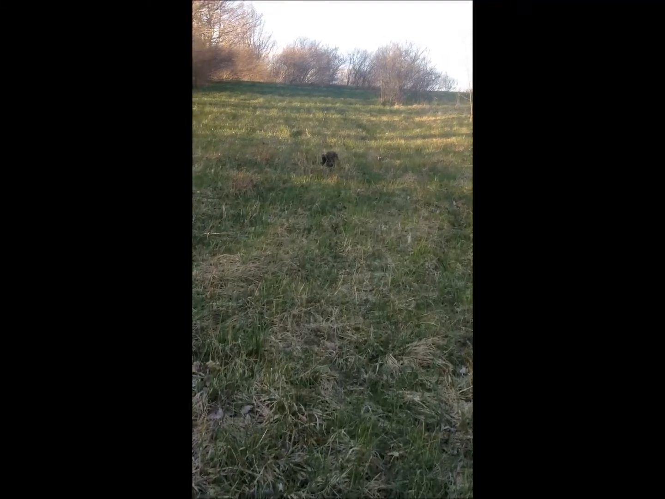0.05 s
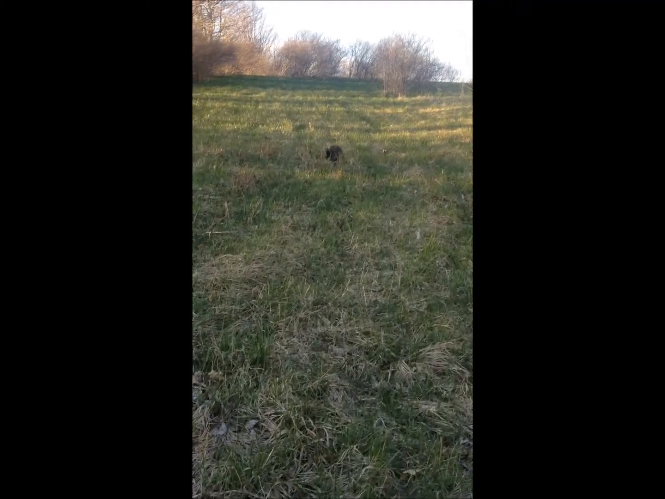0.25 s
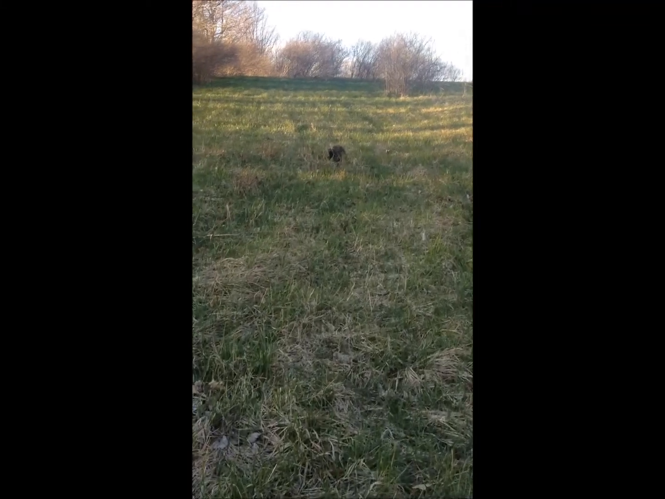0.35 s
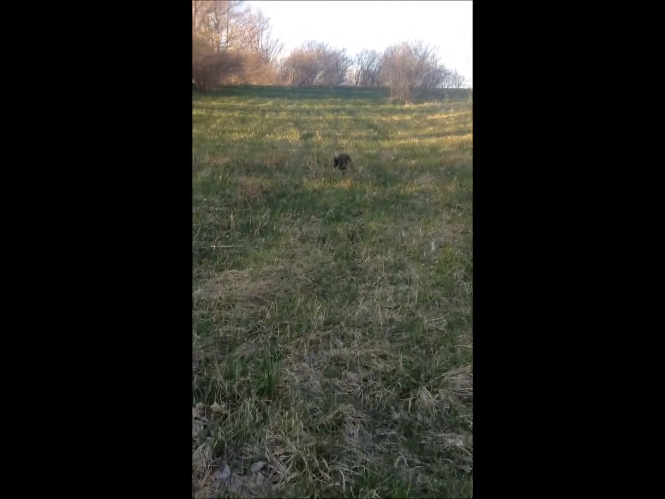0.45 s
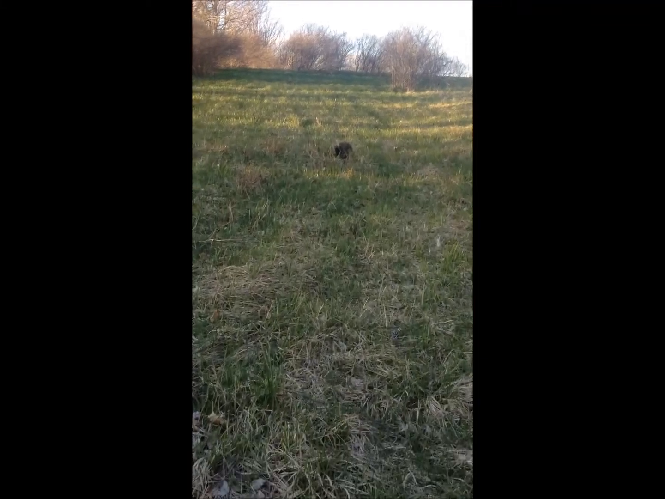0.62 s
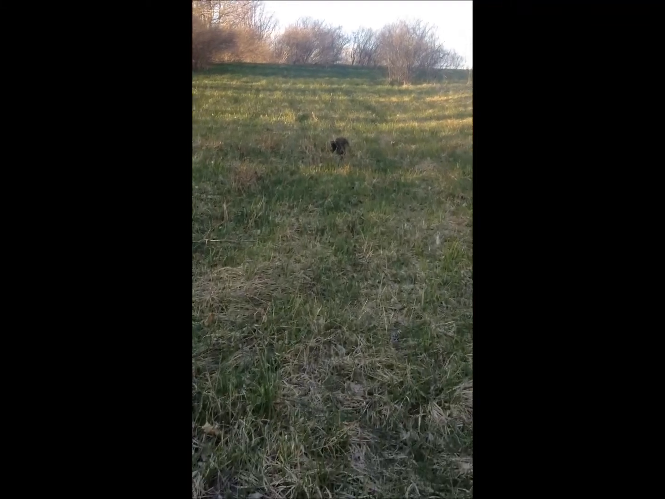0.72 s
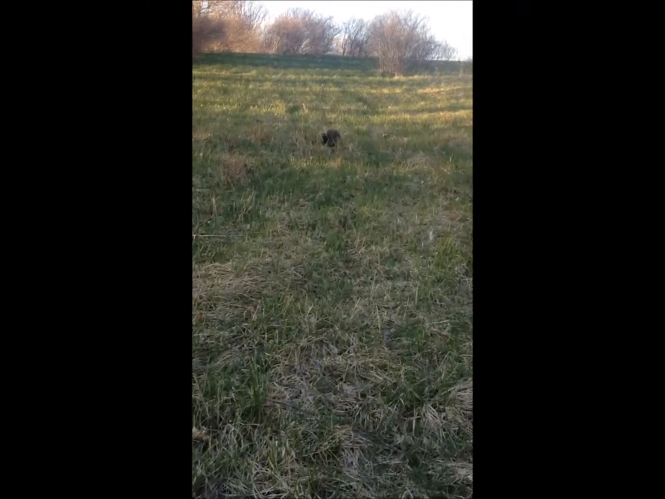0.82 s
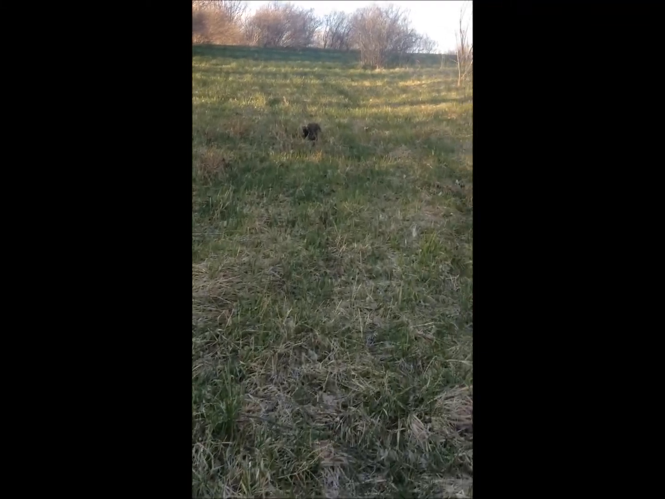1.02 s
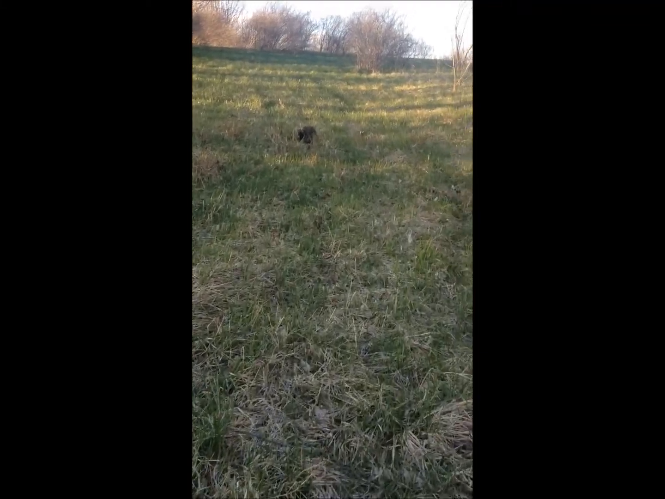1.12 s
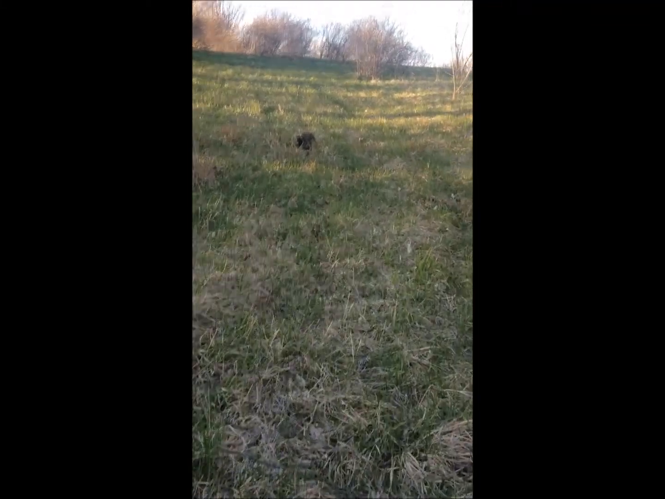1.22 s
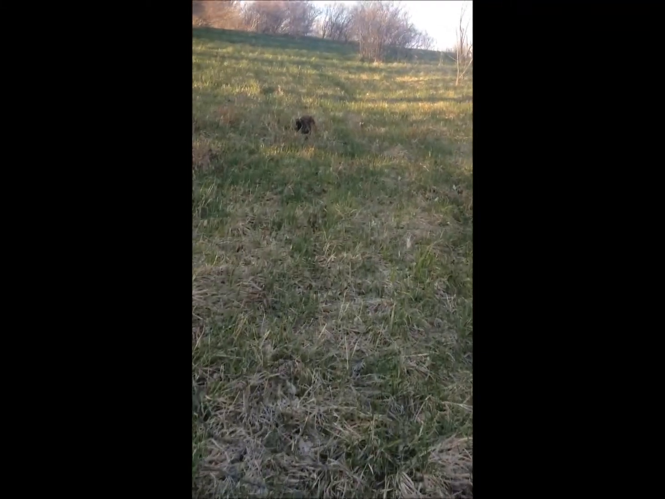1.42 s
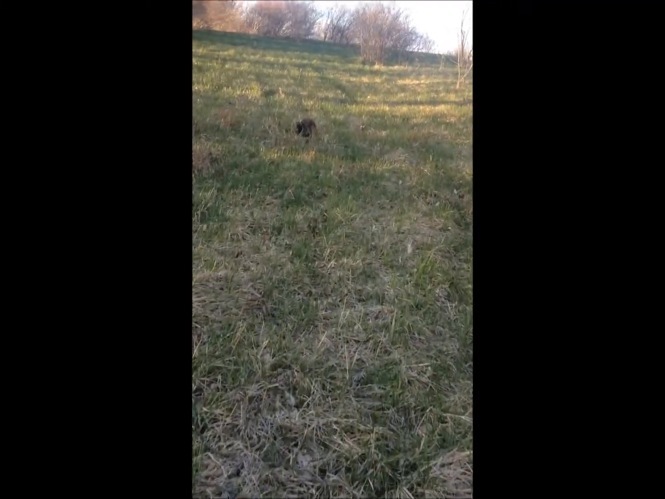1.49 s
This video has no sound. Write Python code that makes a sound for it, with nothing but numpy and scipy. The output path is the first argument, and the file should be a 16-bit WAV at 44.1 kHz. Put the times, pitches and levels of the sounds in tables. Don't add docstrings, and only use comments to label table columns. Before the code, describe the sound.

Two slow steps through dry, matted grass outdoors, with swishing blades, ticking straws, snapping stems and dull soft thuds; very faint breeze and slight low handling rumble beneath, close, dry phone sound without echo.

```python
import sys
import numpy as np
from scipy import signal
from scipy.fft import rfft, irfft
from scipy.io import wavfile
from scipy.ndimage import uniform_filter1d

SR = 44100
rng = np.random.default_rng(int(sys.argv[2]) if len(sys.argv) > 2 else 0)


def generate_wav(sig):
    pcm = np.round(np.clip(np.atleast_2d(sig).T, -1, 1) * 32767).astype(np.int16)
    wavfile.write(sys.argv[1], SR, pcm)


def gain_from_db(level_db):
    decades = np.asarray(level_db, float) / 20
    return 10 ** decades


N = 68355

# pitch_hz, level_db
BREEZE_COLOUR = [(15, -60), (25, -30), (75, -16), (178, -1.5), (509, -5), (722, -16.5), (1050, -10.5),
                 (7700, -21), (15500, -51)]
# pitch_hz, level_db
MAT_COLOUR = [(60, 6), (120, -8.5), (200, -3), (350, -0.5), (600, -3), (1100, -7), (2200, -16.5),
              (5000, -28.5)]
# pitch_hz, level_db
BLADE_COLOUR = [(700, -3.5), (1500, -1), (3000, -0.5), (5000, -2), (8300, -1.5), (9500, -7), (12000, -9),
                (15500, -9)]
# time_s, level_db
WEIGHT = [(0, -59), (.1, -55.5), (.15, -54), (.25, -51), (.34, -49.5), (.42, -48.5), (.5, -55), (.7, -58.5),
          (.82, -59.5), (1.024, -55), (1.061, -41.5), (1.113, -39), (1.141, -65.5), (1.186, -44),
          (1.241, -66), (1.332, -49.5), (1.47, -59.5), (1.53, -56)]
# time_s, level_db, brightness_db_per_octave
SWEEP = [(0, -48.5, -1), (.13, -64.5, 2.5), (0.202, -46, -3), (.3, -50.5, -2), (.345, -42, -5),
         (.42, -45.5, -4), (.47, -49.5, -1), (0.542, -39.5, -1.5), (.63, -46, -1), (.8, -51, -1.5),
         (.84, -58, 0), (1.028, -57, 0), (1.03, -40, -1.5), (1.11, -41.5, 0), (1.145, -44, 0.5),
         (1.206, -41.5, -0.5), (1.39, -57, 2), (1.43, -58.5, -2.5)]
# start_s, peak_db, pitch_hz, length_ms
THUDS = [(0.1086, -47.5, 346, 1.3), (0.2393, -42.5, 472, 5.9), (0.2797, -62, 325, 3.5),
         (0.3138, -44, 313, 4), (0.3278, -41, 335, 32), (0.3693, -42, 510, 9.6), (0.4014, -37.5, 263, 3.2),
         (0.4362, -37, 364, 7.9), (0.4802, -29, 332, 3.2), (0.5526, -41.5, 380, 4.4),
         (0.6075, -41, 296, 1.6), (0.9433, -50.5, 410, 6.3), (1.0438, -33, 206, 4.9),
         (1.0585, -34, 381.5, 20), (1.0755, -34, 326, 4), (1.1089, -43, 310, 3.2), (1.182, -42, 234, 11),
         (1.3203, -42.5, 377, 4.4), (1.3315, -44, 400, 2.7), (1.5056, -44, 305, 4.7),
         (1.5215, -45, 390, 9.6), (1.5285, -43.5, 460, 3), (0.1, -47, 246, 6.6), (0.868, -45, 426, 10)]
# start_s, peak_db, pitch_hz, length_ms
KNOCKS = [(0.0475, -40, 1550, 1.1), (0.0932, -40, 1780, 2.1), (0.1976, -46, 1900, 2.7),
          (0.3133, -38.5, 870, 3.1), (0.3302, -30, 1420, 0.74), (0.337, -33.5, 1510, 5),
          (0.3695, -30, 607, 4.5), (0.3978, -31, 1620, 2.5), (0.4028, -28, 1180, 2.8),
          (0.4361, -30, 840, 3.5), (0.4802, -24.5, 1130, 1.8), (0.5386, -41, 1210, 6.4),
          (0.5539, -26, 930, 1.1), (0.5591, -33.5, 1000, 2.2), (0.6911, -37, 856, 3.8),
          (0.701, -35.5, 814, 1.4), (0.7292, -36.5, 1280, 0.56), (0.8836, -31.5, 1420, 0.97),
          (1.0292, -37.5, 1180, 2), (1.0362, -28.5, 960, 0.51), (1.0602, -20.5, 1036, 2.4),
          (1.0765, -35, 900, 1.9), (1.202, -35.5, 1730, 2.8), (1.2324, -31.5, 1050, 1.3),
          (1.2417, -37, 1260, 0.51), (1.268, -41, 1770, 6.7), (1.3796, -43.5, 1190, 2.2),
          (1.4022, -43.5, 676, 1), (1.4111, -41.5, 1280, 1.1), (1.4681, -47, 1100, 1),
          (0.2435, -40, 725, 1.5), (0.2762, -42, 880, 1.3), (0.2965, -50, 1090, 2.6),
          (1.0628, -40.5, 1060, 4), (1.0657, -35.5, 850, 3.6), (1.1812, -40, 970, 3.1),
          (1.1865, -39.5, 960, 1.5), (1.283, -43.5, 1060, 2.6), (1.3315, -48, 1130, 2),
          (1.4265, -42, 1910, 2)]
# start_s, peak_db, centre_hz, length_ms
SNAPS = [(0.0476, -39.5, 6700, 0.39), (0.0727, -41.5, 2870, 1), (0.0933, -37.5, 4030, 0.21),
         (0.1985, -44, 3740, 2.7), (0.2225, -47, 4820, 2), (0.2552, -41, 3000, 1.1),
         (0.3284, -30.5, 3660, 2.45), (0.3363, -32.0, 4550, 1.5), (0.3465, -36, 4930, 0.83),
         (0.4322, -32.5, 3290, 2.7), (0.4605, -42, 5140, 0.78), (0.4754, -38, 2670, 1.3),
         (0.5533, -36, 4780, 1.6), (0.6079, -49, 6050, 1.5), (0.7292, -42, 6200, 0.33),
         (0.7891, -40.5, 3040, 0.8), (0.7963, -40.5, 3450, 3.1), (1.0293, -27, 7400, 0.55),
         (1.0357, -36, 3960, 0.95), (1.0491, -27, 6900, 0.37), (1.058, -25.5, 6980, 1.16),
         (1.0773, -37, 7000, 1.6), (1.0955, -30, 2880, 3.1), (1.2028, -33, 4120, 1.5),
         (1.2195, -38, 5570, 1.0), (1.2324, -32.5, 4300, 0.25), (1.2687, -34, 5400, 0.45),
         (1.2969, -38, 5340, 0.57), (1.3108, -36, 7600, 0.37), (1.3812, -39, 6500, 0.69)]
# start_s, peak_db, centre_hz, length_ms
TICKS = [(0.009, -42.5, 6160, 0.44), (0.1421, -46, 6600, .5), (0.1755, -46.5, 2800, 1),
         (0.1982, -34.5, 2430, 0.66), (0.2035, -39.5, 2310, 1), (0.2095, -36, 3950, 0.44),
         (0.2245, -32, 5080, 1.7), (0.2435, -36, 3080, 2.2), (0.2475, -40, 7050, .6),
         (0.2752, -40, 3540, 0.45), (0.2957, -45, 4040, .6), (0.3018, -41.5, 7970, .3),
         (0.3125, -45, 3500, 0.46), (0.3705, -41, 4650, 0.91), (0.4185, -40, 6000, .6),
         (0.4361, -19.5, 6280, .45), (0.4815, -22.5, 2900, 1.2), (0.537, -34.5, 4970, 1.7),
         (0.5595, -36, 2000, 0.19), (0.6075, -33.5, 7160, 1.4), (0.6905, -40, 2620, 1.2),
         (0.8719, -45.5, 2550, 3.7), (0.9428, -45, 4720, 1.1), (1.0295, -28, 8540, 0.26),
         (1.031, -33, 8150, 1), (1.0635, -29.5, 7060, 1), (1.0655, -29, 6600, 1), (1.078, -30, 6150, 1.2),
         (1.1005, -30, 8900, .6), (1.1052, -23.5, 6300, 1.0), (1.1095, -31, 2870, 1),
         (1.1822, -34, 3460, .4), (1.242, -35.5, 2320, 0.35), (1.2425, -45, 8100, .4),
         (1.2685, -23.5, 4200, 0.082), (1.2735, -45, 7500, .6), (1.3037, -40, 2500, 0.43),
         (1.3037, -39, 6750, .4), (1.362, -42.5, 7630, 5.1), (1.4025, -46, 5400, 0.55),
         (1.415, -45.5, 4470, 1), (1.4995, -62, 5100, 1), (0.0933, -40.5, 9500, .4),
         (0.8835, -46, 7500, .5)]
# start_s, peak_db, first_hz, second_hz, third_hz
THICK_STALKS = [
    (0.4366, -15, 7540, 2820, 4970),
    (0.4797, -9.5, 4330, 2860, 7630),
    (1.1049, -20.5, 6900, 3100, 11100),
]


def walk(rate):
    hold = int(SR / rate)
    steps = np.repeat(rng.standard_normal(N // hold + 1), hold)
    smooth = uniform_filter1d(uniform_filter1d(steps, hold), hold)
    return 1.3 * smooth[:N]


def unit(x):
    return x / np.sqrt(np.mean(x ** 2))


def bands(x, colour, flicker_db, rate, tilt_db=0.):
    octave = np.log2(np.arange(N // 2 + 1) * SR / N + 1)
    pitch_hz, level_db = np.array(colour).T
    spectrum = rfft(x) * gain_from_db(np.interp(octave, np.log2(pitch_hz), level_db, left=-90))
    out = 0
    for middle in np.arange(4.5, 14.6, .5):
        share = np.clip(1 - 2 * abs(octave - middle), 0, 1)
        band = irfft(spectrum * share, N)
        out = out + band * gain_from_db(flicker_db * walk(rate) + tilt_db * (middle - np.log2(3000)))
    return out


def clicks(per_s, scatter_db, tail_ms):
    when = rng.random(N)
    size = np.minimum(rng.exponential(size=N), 2.8)
    power = (when < per_s / SR) * gain_from_db(2 * scatter_db * size)
    fade = np.exp(-1000 / (SR * tail_ms))
    return rng.standard_normal(N) * np.sqrt(signal.lfilter([1], [1, -fade], power))


def cracks(table, q, rough, broad_db, rise, fall, tail_db, soft):
    length = 2048
    out = np.zeros(N + length)
    t = np.arange(length) / SR
    noise = rng.standard_normal((40, 2, length))
    for (start_s, peak_db, hz, length_ms), (ring_noise, crackle_noise) in zip(table, noise):
        u = t * 1000 / length_ms
        tail = gain_from_db(tail_db) * np.exp(-u / (5 * fall))
        env = (1 - np.exp(-u / rise)) * (np.exp(-u / fall) + tail)
        clean = np.sin(2 * np.pi * hz * t) * np.sqrt(2)
        noisy = unit(signal.lfilter(*signal.iirpeak(hz, q, fs=SR), ring_noise))
        body = (1 - rough) * clean + rough * noisy
        soften = np.concatenate(signal.iirpeak(hz, soft, fs=SR))
        puff = signal.sosfilt([soften, soften], env * body)
        puff = puff + gain_from_db(broad_db) * env * np.diff(crackle_noise, prepend=0)
        peak = np.sqrt(2 * uniform_filter1d(puff ** 2, int(SR / hz) + 12).max())
        i = int(start_s * SR)
        out[i:i + length] += puff * gain_from_db(peak_db) / peak
    return out[:N]


def breeze():
    air = bands(rng.standard_normal(N), BREEZE_COLOUR, flicker_db=1.2, rate=13.1)
    return unit(air) * gain_from_db(-59.5)


def jolts(t):
    time_s, level_db = np.array(WEIGHT).T
    low_band = signal.butter(2, [30, 90], "bandpass", fs=SR)
    rumble = unit(signal.lfilter(*low_band, rng.standard_normal(N)))
    jolt_db = -35.5 + np.interp(t, time_s, level_db) + 3.7 * walk(27.3)
    return rumble * (gain_from_db(-123) + gain_from_db(jolt_db))


def thuds():
    return gain_from_db(-0.5) * cracks(THUDS, q=7.9, rough=.4, broad_db=-53, rise=0.23, fall=0.46,
                              tail_db=-25.5, soft=.55)


def mat(t):
    time_s, level_db = np.array(WEIGHT).T
    grain = clicks(per_s=1200, scatter_db=0, tail_ms=0.71)
    crunch = unit(bands(grain, MAT_COLOUR, flicker_db=5.25, rate=70))
    return crunch * gain_from_db(np.interp(t, time_s, level_db) + 0.68 * walk(39.8))


def knocks():
    return gain_from_db(0.5) * cracks(KNOCKS, q=0.91, rough=.5, broad_db=-29, rise=0.093, fall=0.47,
                             tail_db=-31, soft=.5)


def stalks():
    rise_ms, ring_ms, tail_ms = .3, .85, 3.8
    length = 1024
    out = np.zeros(N)
    t = np.arange(length) / SR
    ms = t * 1000
    noise = rng.standard_normal((6, length))
    splinter_band = signal.butter(2, [1500, 8000], "bandpass", fs=SR)
    for (start_s, peak_db, *modes_hz), crackle in zip(THICK_STALKS, noise):
        ring = sum(gain_from_db(db) * np.sin(2 * np.pi * hz * t) for db, hz in zip((0, -1.5, -9), modes_hz))
        ring = ring * (1 - np.exp(-(ms / rise_ms) ** 2)) * np.exp(-ms / ring_ms)
        splinter_env = np.exp(-ms / tail_ms) * np.minimum(ms / rise_ms, 1) ** 2
        splinters = signal.lfilter(*splinter_band, crackle * splinter_env)
        i = int(start_s * SR)
        out[i:i + length] += gain_from_db(peak_db) * (ring + gain_from_db(-10) * splinters)
    return out


def snaps():
    return gain_from_db(2.5) * cracks(SNAPS, q=0.86, rough=0.72, broad_db=-16, rise=0.11, fall=0.92,
                             tail_db=-2.5, soft=.35)


def ticks():
    return cracks(TICKS, q=3, rough=.35, broad_db=-22, rise=.1, fall=.7, tail_db=-16, soft=.7)


def blades(t):
    time_s, level_db, brightness_db = np.array(SWEEP).T
    grain = clicks(per_s=6500, scatter_db=3, tail_ms=0.57)
    tilt_db = np.interp(t, time_s, brightness_db)
    swish = unit(bands(grain, BLADE_COLOUR, flicker_db=2.0, rate=170, tilt_db=tilt_db))
    return swish * gain_from_db(np.interp(t, time_s, level_db) + .9 * walk(89.7))


def scene():
    t = np.arange(N) / SR
    return (blades(t) + mat(t) + snaps() + stalks() + knocks() + thuds() + breeze() + ticks())[None]


def band_limit(x):
    return signal.sosfilt(signal.butter(12, 16470, fs=SR, output="sos"), x)


def record(dry):
    bass_cut = signal.butter(4, 140, "highpass", fs=SR, output="sos")
    top_cut = signal.ellip(10, .5, 42, 15330, fs=SR, output="sos")
    mix = signal.sosfilt(bass_cut, dry) + jolts(np.arange(N) / SR)
    mix = signal.sosfilt(top_cut, mix)
    return band_limit(mix)


dry = scene()
out = record(dry)
generate_wav(out)
```